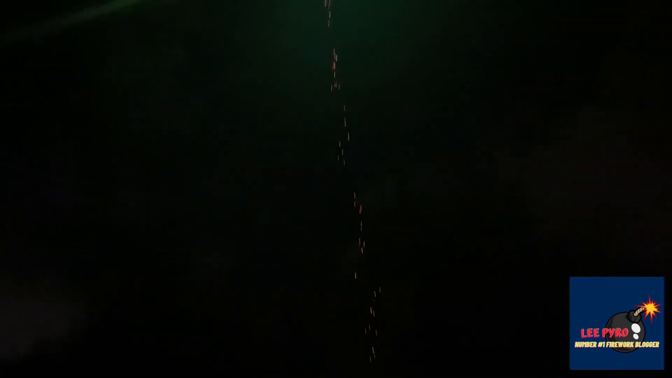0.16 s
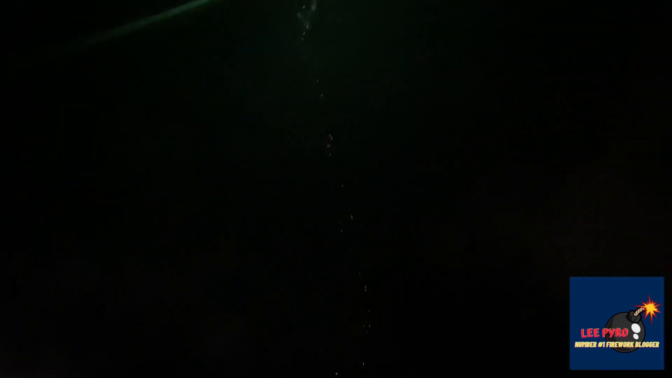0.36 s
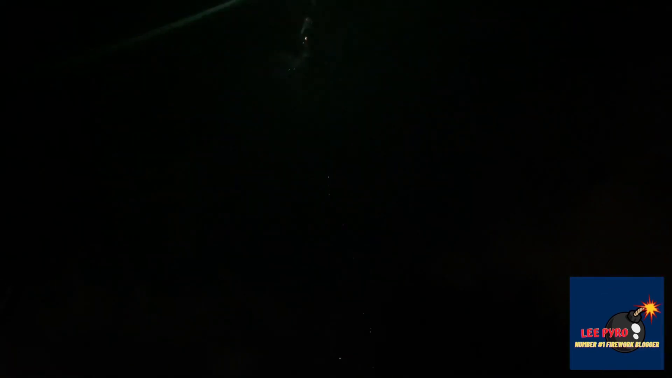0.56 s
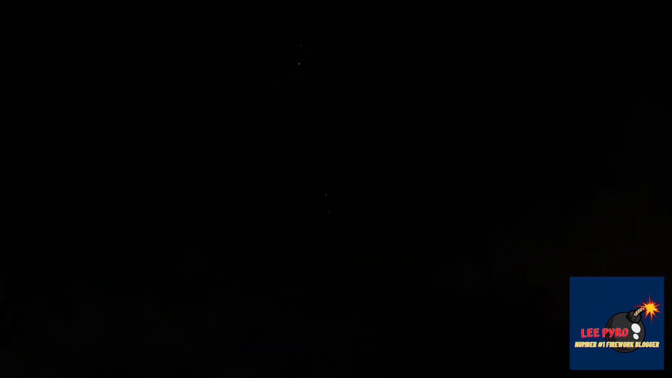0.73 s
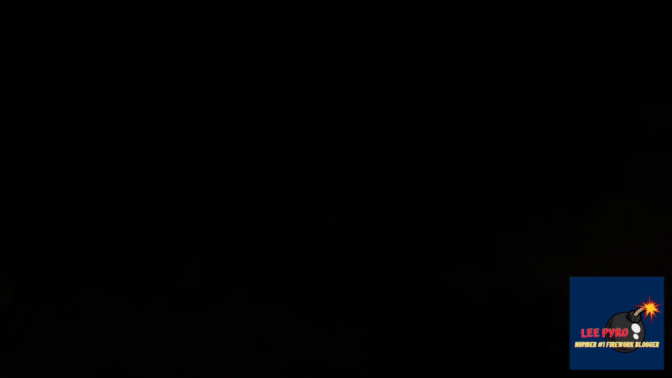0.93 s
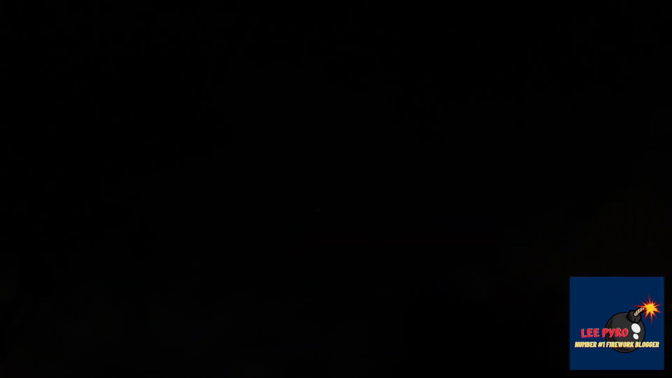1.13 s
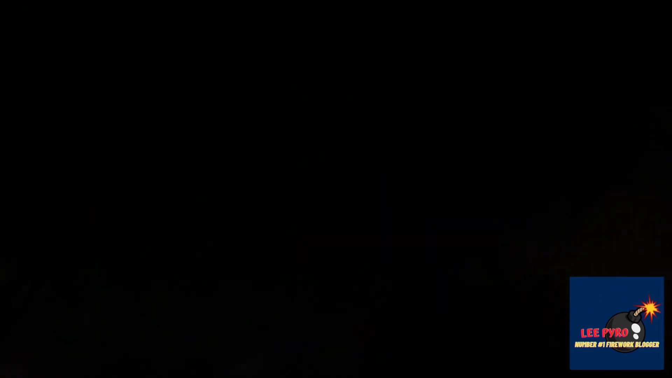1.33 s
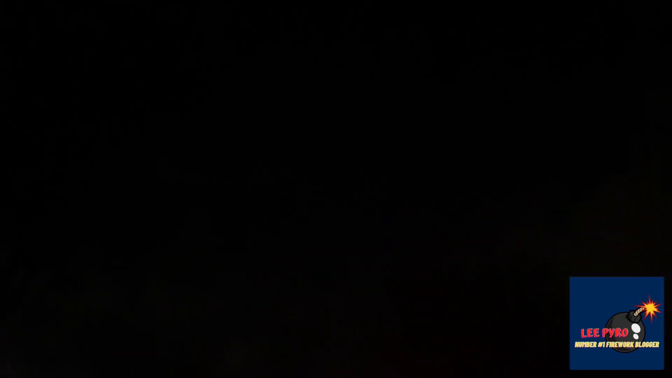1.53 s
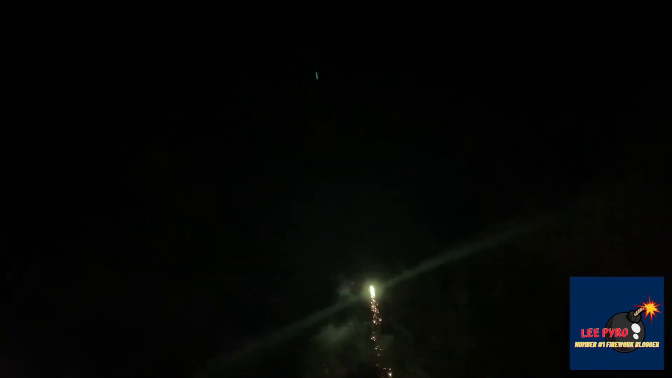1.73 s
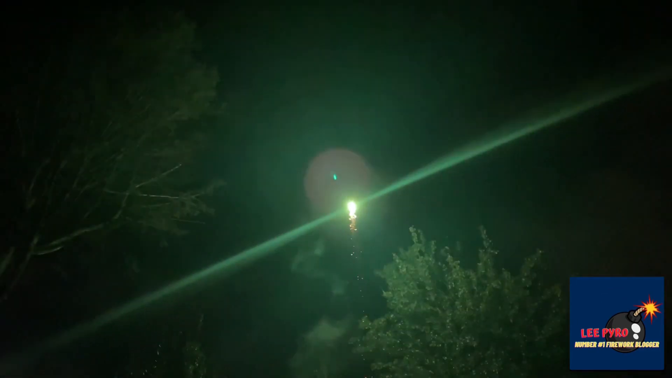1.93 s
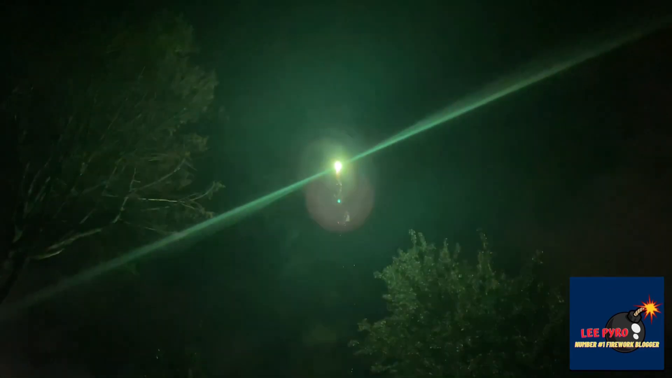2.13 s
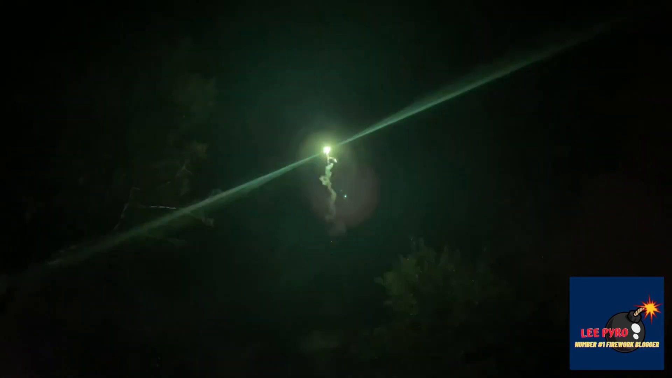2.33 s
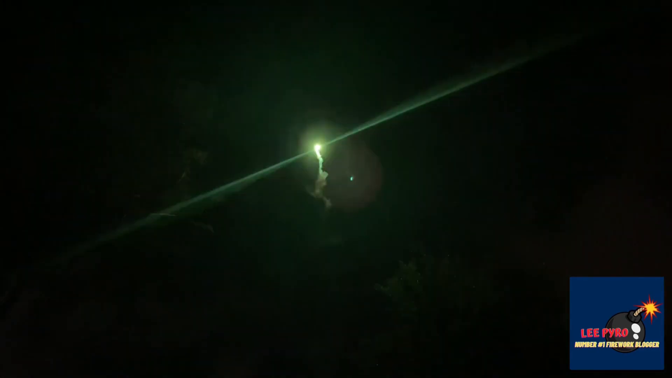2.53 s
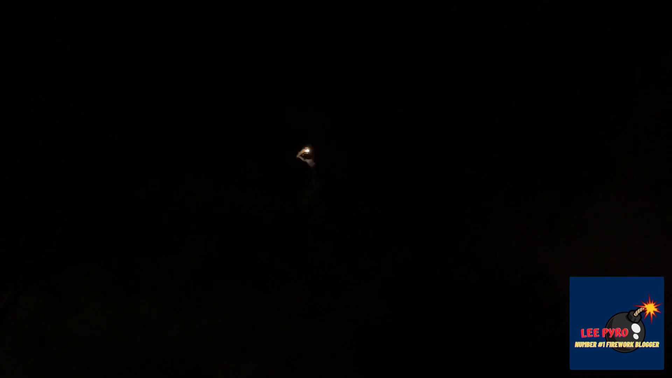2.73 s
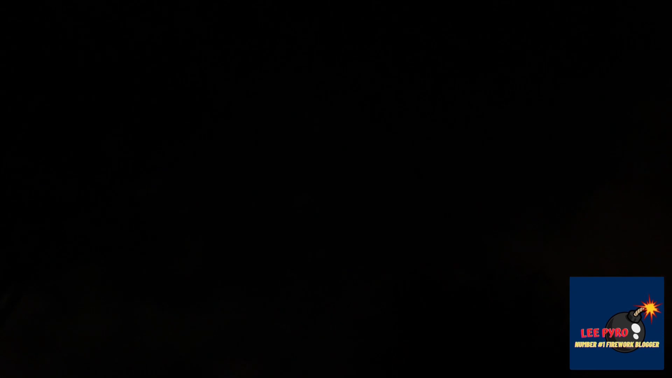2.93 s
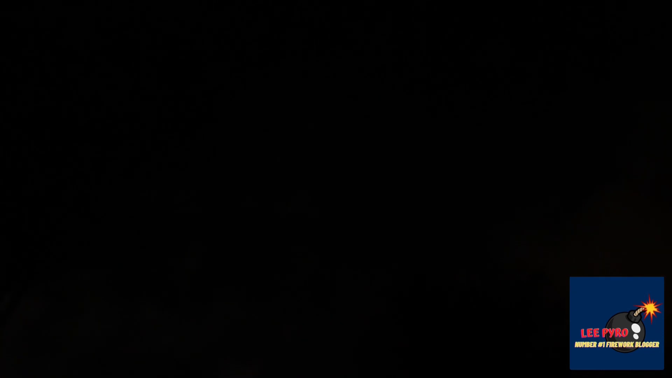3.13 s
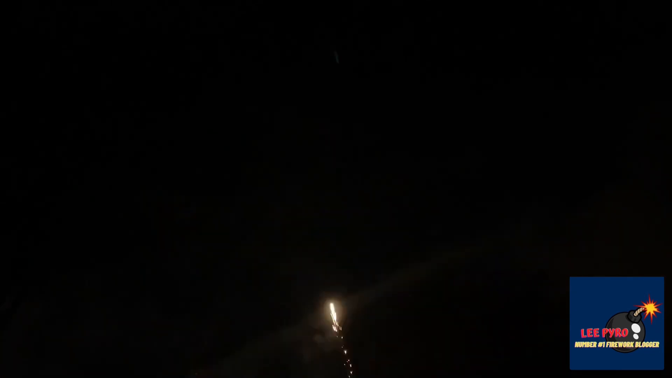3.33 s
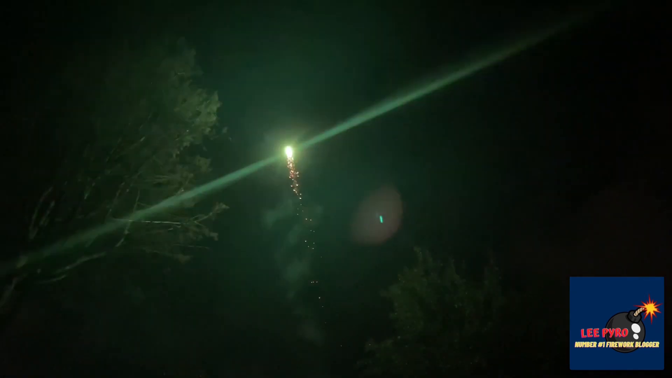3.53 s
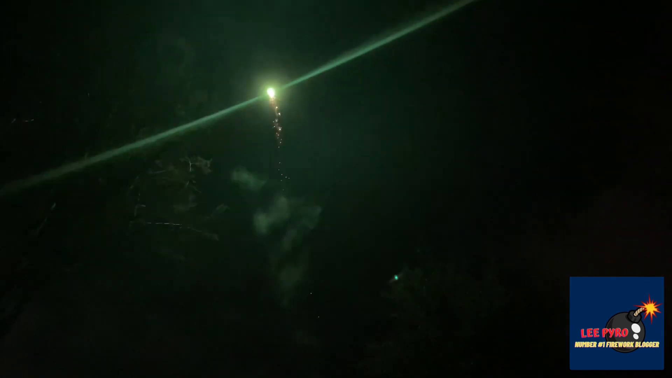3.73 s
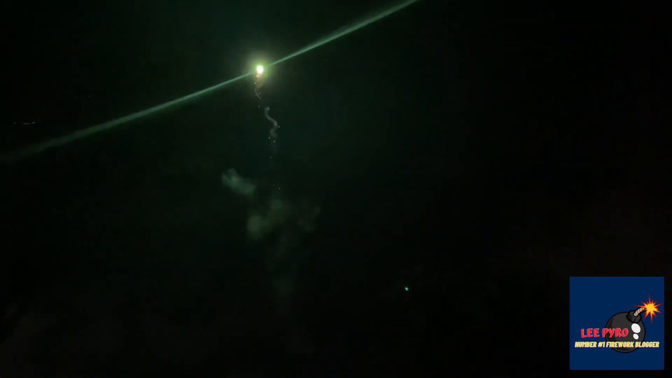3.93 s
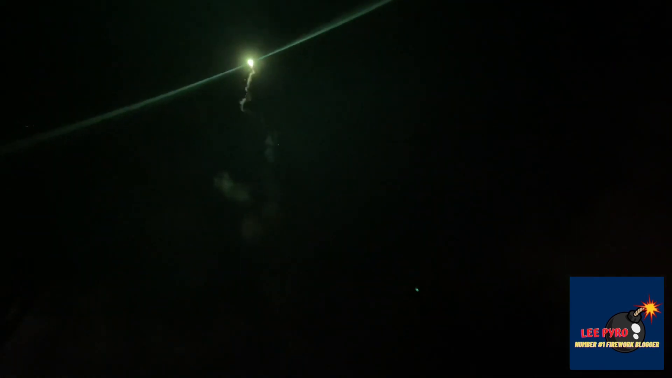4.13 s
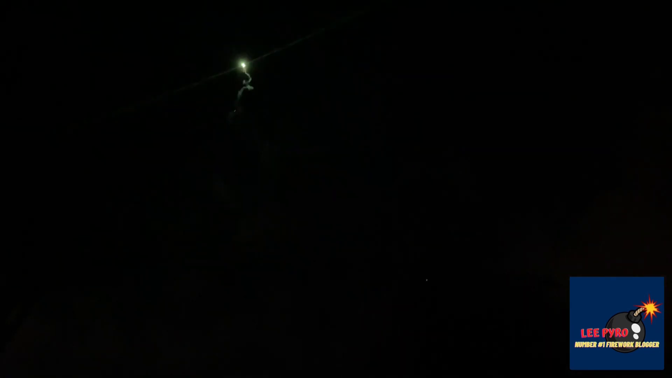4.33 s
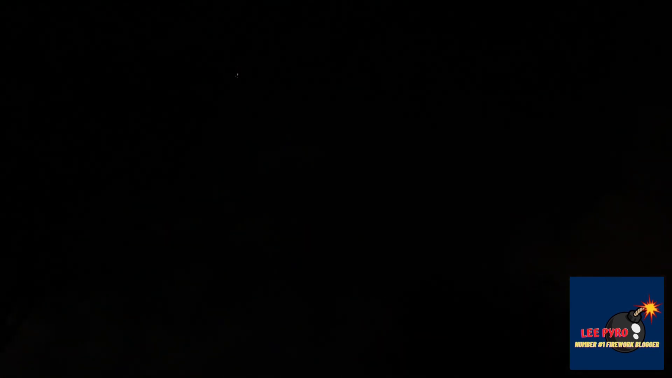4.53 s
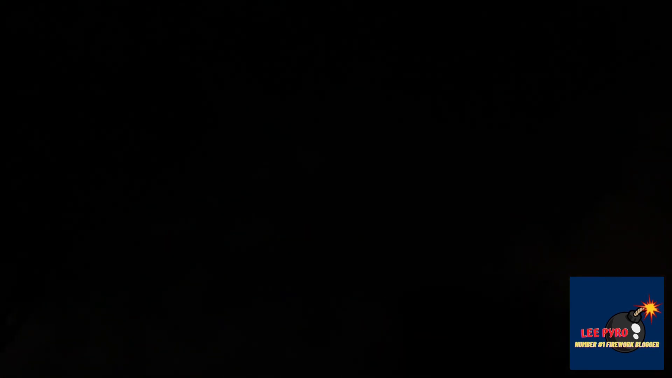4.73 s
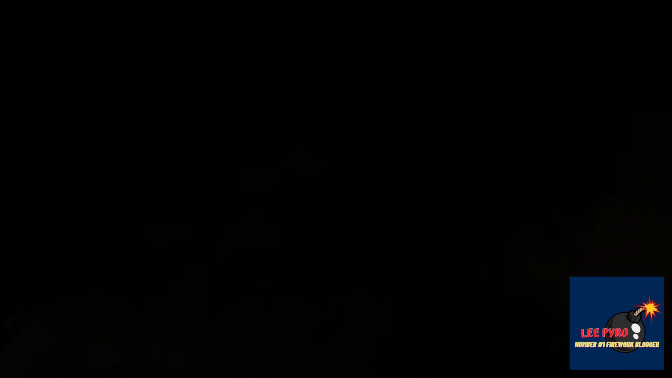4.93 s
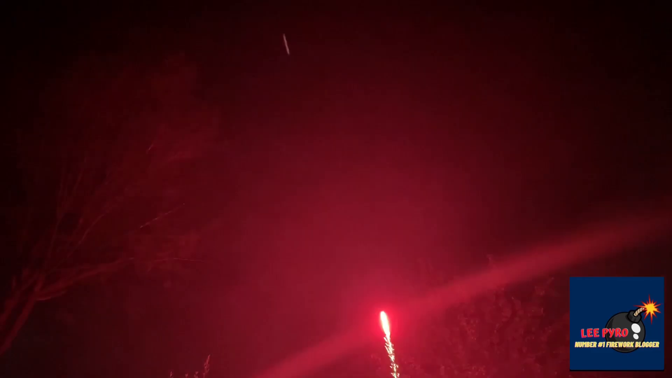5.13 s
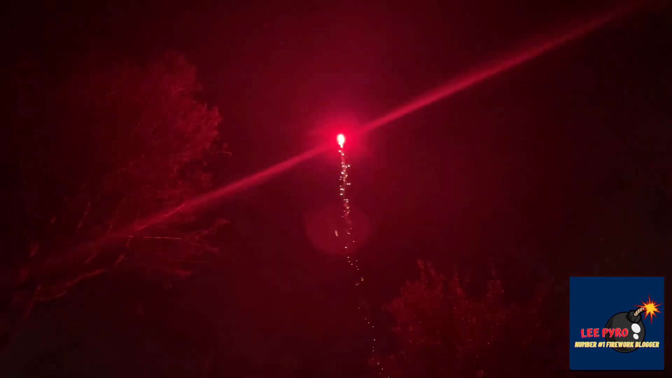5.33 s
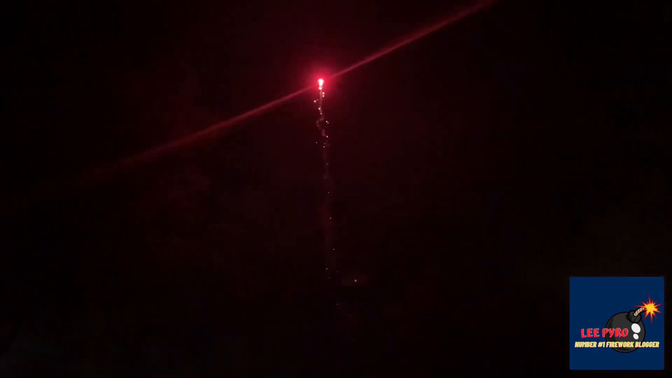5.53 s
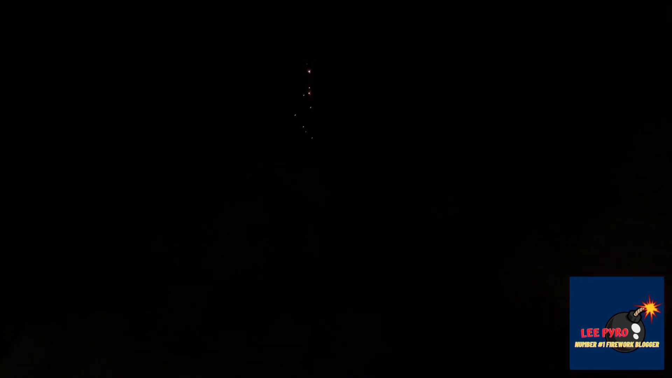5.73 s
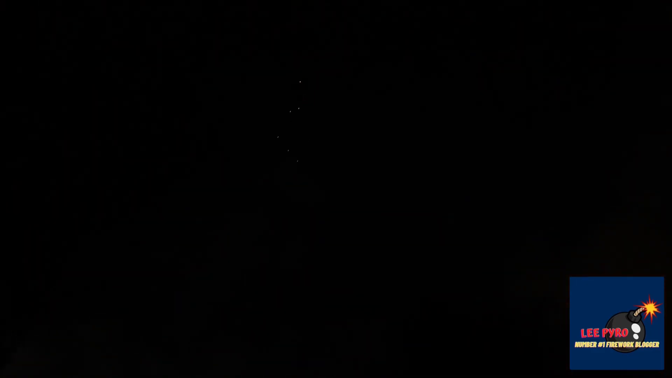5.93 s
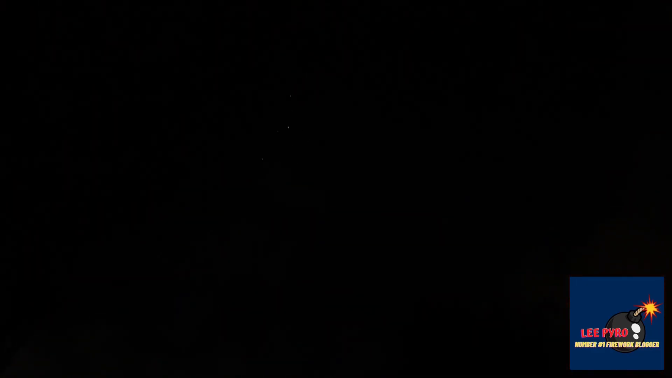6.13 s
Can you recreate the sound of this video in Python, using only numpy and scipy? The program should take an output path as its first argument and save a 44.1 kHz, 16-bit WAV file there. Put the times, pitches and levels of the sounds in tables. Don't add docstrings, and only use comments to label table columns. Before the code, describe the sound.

A firework candle in a night garden, a few metres from a small microphone. Faint powder hiss and distant traffic hum, then three widely spaced bangs: a softer whooshing pop, a louder hollow one, and a short bright crack. Each hoots in the tube and scatters off trees and walls for about half a second. Tiny sparks tick between shots, with low air rumble on the microphone.

```python
import sys
import numpy as np
from scipy import signal
from scipy.fft import rfft, irfft
from scipy.io import wavfile
from scipy.ndimage import uniform_filter1d

SR = 44100
rng = np.random.default_rng(int(sys.argv[2]) if len(sys.argv) > 2 else 0)


def output_pcm(signal):
    pcm = np.clip(np.atleast_2d(signal).T, -1, 1) * 32767
    wavfile.write(sys.argv[1], SR, np.round(pcm).astype(np.int16))


def level_to_linear(level):
    exponent = np.asarray(level, float) / 20
    return 10 ** exponent


N = 276507

# pitch_hz, density_db
TRAFFIC_SPECTRUM = [(30, -3), (55, -5.5), (140, -12.5), (307, -12.5), (450, -14), (860, -10.5),
                    (1300, -14.5), (2190, -23.5), (3500, -42), (5000, -60)]
TRAFFIC_DB = -61

# pitch_hz, density_db
SWAY_SPECTRUM = [(1.3, 1), (3, 2), (6, 12), (11, 2), (14, 5.5), (18, -16), (22, -17), (27, -31.5),
                 (33, -28), (45, -58), (90, -140)]
# time_s, level_db
GUST_STRENGTH = [(0.0, -18), (0.07, -13.5), (0.19, -29), (0.28, -17), (0.55, -35), (0.79, -28.5),
                 (0.88, -47), (1.02, -25), (1.09, -44.5), (1.35, -26.5), (2.19, -38), (2.35, -25),
                 (2.95, -40.5), (4.37, -30.5), (5.13, -44.5), (5.78, -26), (5.82, -38.5), (6.2, -30)]

# pitch_hz, density_db
HISS_SPECTRUM = [(1200, -28), (2500, 0.5), (4000, 0), (6500, -3), (8200, -7.5), (10500, -10.5),
                 (13000, -22), (16000, -45)]
# pitch_hz, density_db
FIZZ_SPECTRUM = [(3000, -30), (6500, -8), (8200, 0.4), (10000, -11), (11500, -5), (13500, -4.5),
                 (15000, -8), (15800, -14.5), (17000, -27.5)]
# pitch_hz, width_hz, level_db
TUBE_WHISTLES = [(3450, 320, -4), (5100, 57, 3), (5500, 20, 6.5), (6150, 86, 2.5), (7040, 280, -1),
                 (9200, 230, -6.5), (10240, 31, -6)]
WHISTLE_DB = -6
# lit_s, hiss_db, fizz_db, full_burn_s, fade_db_per_s (climbing away)
STARS = [
    (-.5, -70, -80, 0.926, 15.5),
    (1.31, -68, -70, 0.819, 17.5),
    (3.099, -70, -73.5, 0.41, 11),
    (4.94, -68, -74.5, 0.345, 23),
]
FIZZ_FADES = 1.6
# start_s, length_s, level_db
FUSE_SPELLS = [
    (0, 2.93, -77.5),
    (.95, 0.16, -78.5),
    (2.8, .35, -85),
    (3.101, 1.5, -78.5),
    (4.076, 0.14, -78),
    (4.6, 0.35, -82.5),
    (4.994, 1.3, -78.5),
    (5.697, 0.64, -78.5),
]
FUSE_FIZZ_DB, FUSE_EDGE_S = -6, 0.06
FUSE_HZ, FUSE_WIDTH_HZ, FUSE_BAND_DB = 6500, 2000, -8

# start_s, peak_db, pitch_hz, t60_s, top_hz
SPARKS = [(2.305, -55, 4200, 0.0206, 9000), (2.654, -62, 6050, 0.045, 8000), (2.736, -64, 8200, .02, 10100),
          (2.838, -60, 8600, 0.066, 12200), (2.969, -65.5, 6500, 0.018, 9750),
          (4.484, -67, 6400, 0.033, 9000), (4.8174, -62, 5070, 0.098, 9700),
          (4.8974, -59, 4760, 0.065, 9050), (4.918, -66.5, 4720, 0.024, 5960),
          (5.152, -57.5, 12920, .015, 15500), (5.266, -68, 13000, .015, 15580),
          (5.3152, -62, 7900, 0.006, 16000), (5.397, -70.5, 13500, 0.016, 15350),
          (5.468, -67.5, 12450, .015, 14730)]
SNAP_S, SNAP_DB = 5.3151, -32.5

# start_s, swell_s, swell_db, jet_db, jet_t60_s
CHARGES = [
    (1.3030, .0082, 38, -22.5, .08),
    (3.0960, 0.00505, 18.5, -16.5, .035),
    (4.9334, 0.0052, 10.5, -14, 0.017),
]
# crack_db, crack_half_width_s, ring_hz, ring_db, thump_db
MUZZLES = [
    (-17, 0.000036, 2000, -23, -38),
    (-8, 0.00008, 860, -11.5, -28.5),
    (-9, 0.000054, 2500, -13, -29),
]
# pitch_hz, density_db
BLAST_SPECTRUM = [(150, -31), (300, -2.5), (500, -7.5), (900, -4), (2400, -4), (4500, -6), (6300, -5),
                  (8200, -11), (10800, -10.5), (14000, -19.5), (16000, -31)]
THUMP_HZ, THUMP_S, PUFF_DB, PUFF_T60_S = 97, 0.0043, -2, 0.084
# pitch_hz, width_hz, level_db
COLUMNS = [
    [(537, 120, 9.5), (1534, 24, 7.5), (1785, 35, 8), (2475, 26.9, -3), (3530, 81, -29.5)],
    [(827, 55, 3.5), (1542, 16, -3), (1846, 39, -1), (2559.6, 120, -4.5), (3270, 55, -28)],
    [(495, 110, -12), (807, 53, -3), (1170, 43, -8), (2262, 40, -15), (3067, 23, -20.5)],
]
# peak_s, near_db, hoot_db, far_db, tilt_db_per_octave
ECHOES = [
    (0.02214, -26, -25, -38, -0.56),
    (0.017, -24.5, -17.5, -34.5, 0),
    (0.015, -21, -19.5, -31.5, 0.5),
]
# pitch_hz, density_db
RETURN_SPECTRUM = [(60, -15), (200, -7), (500, -5.5), (900, -4), (2000, -6.5), (5500, -10), (8000, -12),
                   (11000, -22), (14000, -22), (16000, -33.5)]
# pitch_hz, t60_s
FAR_DECAY = [(100, .7), (500, .52), (2000, .56), (6000, .5), (14000, .44)]
# pitch_hz, width_hz, level_db
LINGERING = [
    [(2610, 67, -1), (4320, 29, -6), (5130, 78, 0), (6160, 200, -10)],
    [(1630, 80, 3), (2590, 79, 1.5), (4760, 45, -5), (6560, 67, -9)],
    [(854.4, 55, 5.5), (2350, 61, -4), (5500, 65, 5.5), (6040, 68, -2)],
]
LINGER_DB = 1
NEAR_T60_S, HOOT_T60_S = 0.15, 0.098
FLUTTER_S, FLUTTER_DB = 0.0142, 2.6
EARLIER_DB, EARLIER_T60_S = -57.5, 1

# pitch_hz, width_hz, level_db
HOUSING_BANDS = [(6500, 400, -11.5), (10190, 390, -5.5)]
TOP_HZ = 16050


def rms_one(x):
    return x / np.sqrt(np.mean(x ** 2) + 1e-20)


def in_time(rows):
    s, *columns = np.transpose(rows)
    return [np.interp(np.arange(N) / SR, s, c) for c in columns]


def at_hz(points, hz):
    points_hz, values = np.transpose(points)
    return np.interp(np.log(hz), np.log(points_hz), values)


def coloured(spectrum, size=N, tilt_db=0):
    hz = np.maximum(np.fft.rfftfreq(size, 1 / SR), 1)
    gain = level_to_linear(at_hz(spectrum, hz) + tilt_db * np.log2(hz / 2000))
    return rms_one(irfft(rfft(rng.standard_normal(size)) * gain, size))


def band(x, low_hz, high_hz, order=2):
    return signal.sosfilt(signal.butter(order, [low_hz, high_hz], "band", fs=SR, output="sos"), x)


def resonance(x, hz, width_hz):
    r = np.exp(-np.pi * width_hz / SR)
    poles = [1, -2 * r * np.cos(2 * np.pi * hz / SR), r * r]
    return signal.lfilter([(1 - r * r) / 2, 0, (r * r - 1) / 2], poles, x)


def through(x, modes):
    total = 0
    for k, (hz, width_hz, db) in enumerate(modes):
        total = total + level_to_linear(db) * resonance(x, hz, width_hz) * (-1) ** k
    return rms_one(total)


def drift(rate_hz, size=N):
    r = np.exp(-2 * np.pi * rate_hz / SR)
    wander = signal.lfilter([1], [1, -2 * r, r * r], rng.standard_normal(size + SR))
    return rms_one(wander[SR:])


def fall(t, t60):
    return (t >= 0) * level_to_linear(-60 * np.maximum(t, 0) / t60)


def build_up(t, peak_s, t60):
    rise = np.exp(-0.5 * (np.minimum(t - peak_s, 0) / 0.0043) ** 2)
    return rise * fall(np.maximum(t - peak_s, 0), t60)


def far_traffic():
    return level_to_linear(TRAFFIC_DB + 0.5 * drift(4)) * coloured(TRAFFIC_SPECTRUM)


def gusts():
    sway = coloured(SWAY_SPECTRUM)
    height = np.sqrt(uniform_filter1d(sway ** 2, 8820))
    strength = level_to_linear(in_time(GUST_STRENGTH)[0]) / (height + 0.15)
    for _ in range(2):
        strength = uniform_filter1d(strength, 3000)
    first_rise = np.clip(0.32 + np.arange(N) / SR / 0.1, 0, 1)
    return 1.713 * strength * sway * first_rise


def burning():
    t = np.arange(N) / SR
    hiss, fizz, fuse = np.zeros(N), np.zeros(N), np.zeros(N)
    for lit_s, hiss_db, fizz_db, full_s, fade_db in STARS:
        loss_db = fade_db * np.maximum(t - lit_s - full_s, 0)
        hiss += (t >= lit_s) * level_to_linear(hiss_db - loss_db) ** 2
        fizz += (t >= lit_s) * level_to_linear(fizz_db - FIZZ_FADES * loss_db) ** 2
    for start_s, length_s, db in FUSE_SPELLS:
        inside_s = np.minimum(t - start_s, start_s + length_s - t)
        fuse += level_to_linear(db) ** 2 * np.clip(inside_s / FUSE_EDGE_S + 0.5, 0, 1)
    return np.sqrt(hiss + fuse), np.sqrt(fizz + level_to_linear(FUSE_FIZZ_DB) ** 2 * fuse), np.sqrt(fuse)


def powder():
    hiss, fizz, fuse = burning()
    flicker_db = 0.7 * drift(40)
    air = rng.standard_normal(N)
    whistles = level_to_linear(WHISTLE_DB) * through(air, TUBE_WHISTLES)
    hiss = hiss * level_to_linear(flicker_db) * rms_one(coloured(HISS_SPECTRUM) + whistles)
    fizz = fizz * level_to_linear(flicker_db + 1.2 * drift(150)) * coloured(FIZZ_SPECTRUM)
    fuse_air = through(air[::-1], [(FUSE_HZ, FUSE_WIDTH_HZ, 0)])
    return hiss + fizz + fuse * level_to_linear(FUSE_BAND_DB + flicker_db) * fuse_air


def spits():
    out, t = np.zeros(N), np.arange(2048) / SR
    for start_s, peak_db, hz, t60, top_hz in SPARKS:
        air = rng.standard_normal(len(t))
        tick = band(1.2 * fall(t, 0.006) * air, 0.45 * hz, top_hz)
        puff = 0.4 * fall(t, t60) * rms_one(resonance(air, hz, 900))
        out[round(start_s * SR):][:len(t)] += level_to_linear(peak_db - 3.0) * (tick + puff)
    click = 1.0 * (np.arange(N) == round(SNAP_S * SR))
    return out + level_to_linear(SNAP_DB) * band(click, 2200, 17000)


def scatter(t, peak_s, near_db, far_db, tilt_db, linger):
    near = level_to_linear(near_db) * build_up(t, peak_s, NEAR_T60_S) * coloured(BLAST_SPECTRUM, len(t), tilt_db)
    lingering = level_to_linear(LINGER_DB) * through(rng.standard_normal(len(t)), linger)
    noises = [coloured(RETURN_SPECTRUM, len(t), tilt_db) + lingering for _ in range(2)]
    far = 0
    edges = np.geomspace(40, 18000, 16)
    for k, (low, high) in enumerate(zip(edges, edges[1:])):
        t60 = at_hz(FAR_DECAY, np.sqrt(low * high))
        far = far + band(noises[k % 2], low, high) * build_up(t, peak_s, t60)
    return near + level_to_linear(far_db + 1.5 * drift(40, len(t))) * far


def hoot(t, peak_s, hoot_db, modes):
    air = rng.standard_normal(len(t))
    column = 0
    for hz, width_hz, db in modes:
        mode = resonance(resonance(air, hz, 1.07 * width_hz), hz, 340)
        column = column + level_to_linear(db) * rms_one(mode)
    return level_to_linear(hoot_db) * build_up(t, peak_s, HOOT_T60_S) * rms_one(column)


def blast(t, swell_s, swell_db, jet_db, jet_t60, crack_db, half_width_s, ring_hz, ring_db, thump_db):
    since_exit = t - swell_s
    after_exit = np.maximum(since_exit, 0)
    rise = level_to_linear(-swell_db * np.clip(1 - t / swell_s, 0, 1)) * np.minimum(t / 0.00074, 1)
    jet = level_to_linear(jet_db) * rise * fall(after_exit, jet_t60) * coloured(BLAST_SPECTRUM, len(t))
    u = since_exit / half_width_s
    crack = level_to_linear(crack_db) * u * np.exp(0.5 - u * u / 2)
    air = rng.standard_normal(len(t))
    mouth = rms_one(resonance(air, ring_hz, 1000)) - 0.73 * rms_one(resonance(air, 660, 480))
    ring = level_to_linear(ring_db - 6.5) * mouth * np.exp(-0.5 * ((since_exit - 0.002) / 0.0016) ** 2)
    push = np.sin(2 * np.pi * THUMP_HZ * since_exit) * np.exp(-0.5 * (since_exit / THUMP_S) ** 2)
    puff = level_to_linear(PUFF_DB) * rise * fall(after_exit, PUFF_T60_S) * rms_one(band(air, 120, 260))
    thump = level_to_linear(thump_db) * (push + puff)
    return jet + crack + ring + thump


def candle():
    out, t = np.zeros(N + SR), np.arange(SR) / SR
    out[:SR] += level_to_linear(EARLIER_DB) * fall(t, EARLIER_T60_S) * coloured(RETURN_SPECTRUM, SR)
    shots = zip(CHARGES, MUZZLES, ECHOES, COLUMNS, LINGERING)
    for (start_s, *charge), muzzle, echo, modes, linger in shots:
        peak_s, near_db, hoot_db, far_db, tilt_db = echo
        answer = hoot(t, peak_s, hoot_db, modes)
        answer = answer + scatter(t, peak_s, near_db, far_db, tilt_db, linger)
        beat = np.cos(2 * np.pi * (t - peak_s) / FLUTTER_S)
        flutter = level_to_linear(FLUTTER_DB * fall(t, 0.082) * beat)
        swell_s = charge[0]
        arrived = np.clip((t - swell_s) / 0.007, 0, 1)
        out[round(start_s * SR):][:SR] += blast(t, *charge, *muzzle) + answer * flutter * arrived
    return out[:N]


def scene():
    return (far_traffic() + gusts() + powder() + spits() + candle())[None]


def top_cut(x):
    return signal.sosfilt(signal.butter(12, 16480, fs=SR, output="sos"), x)


def record(dry):
    x = dry
    for hz, width_hz, lift_db in HOUSING_BANDS:
        x = x + level_to_linear(lift_db) * resonance(dry, hz, width_hz)
    x = signal.sosfilt(signal.cheby2(14, 45, TOP_HZ, fs=SR, output="sos"), x)
    return top_cut(x)


dry = scene()
out = record(dry)
output_pcm(out)
```